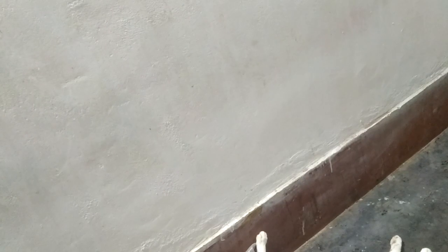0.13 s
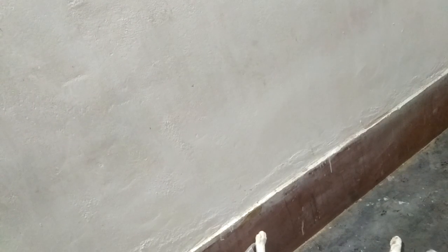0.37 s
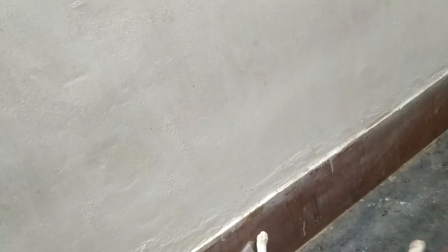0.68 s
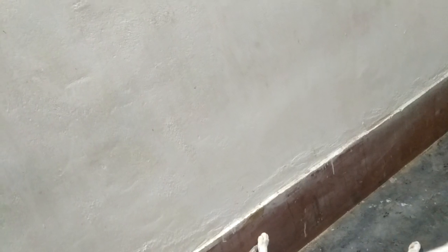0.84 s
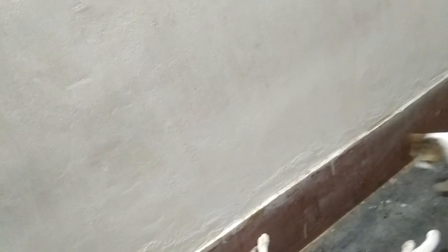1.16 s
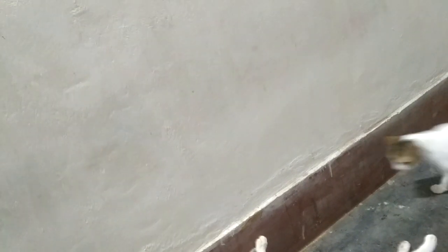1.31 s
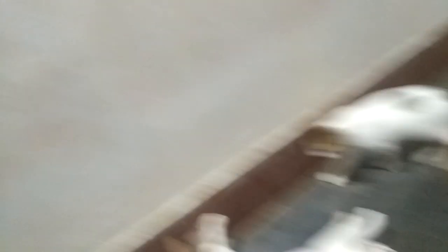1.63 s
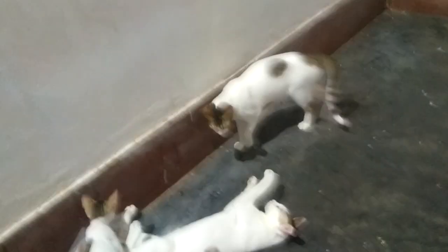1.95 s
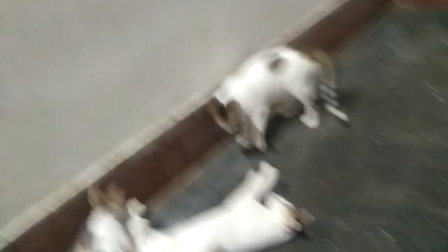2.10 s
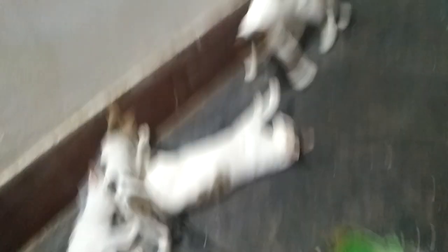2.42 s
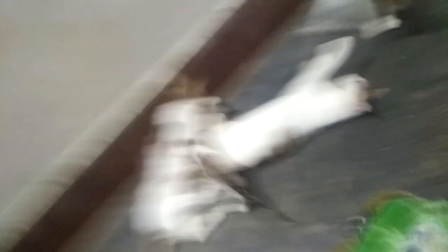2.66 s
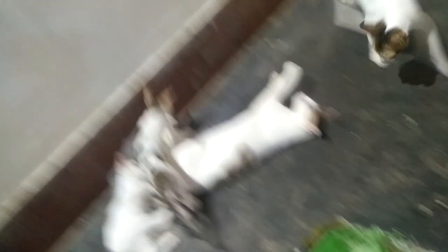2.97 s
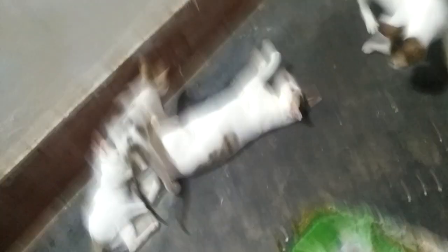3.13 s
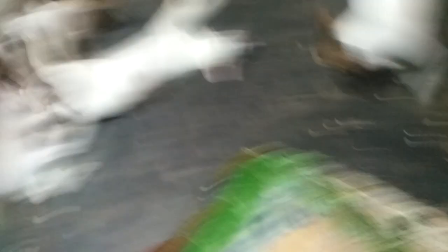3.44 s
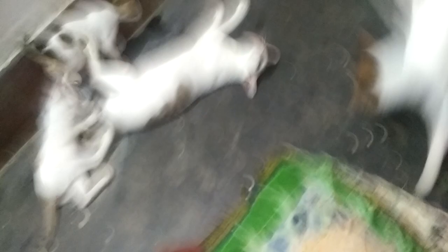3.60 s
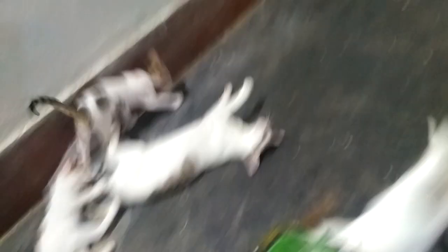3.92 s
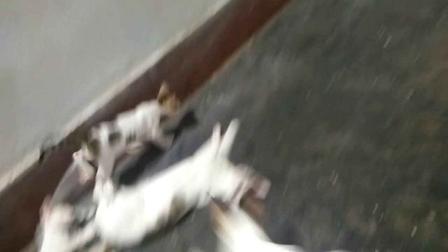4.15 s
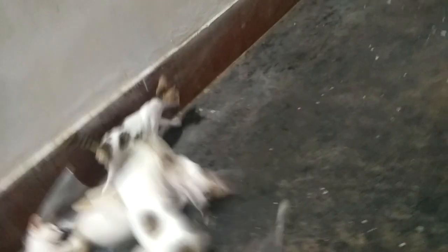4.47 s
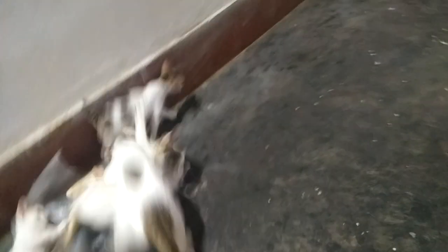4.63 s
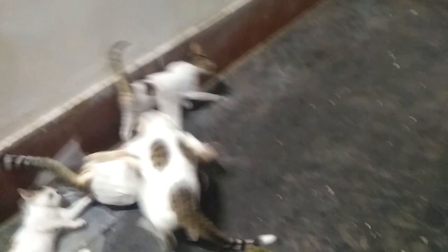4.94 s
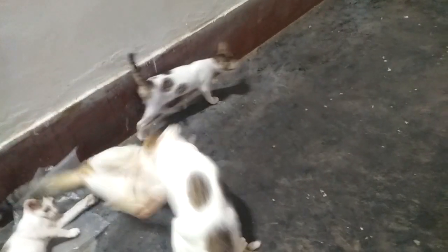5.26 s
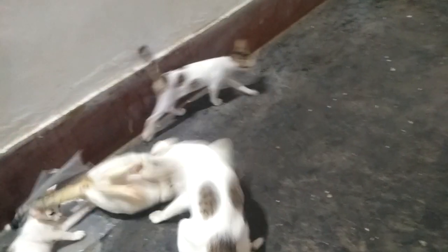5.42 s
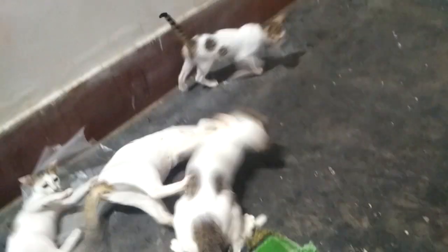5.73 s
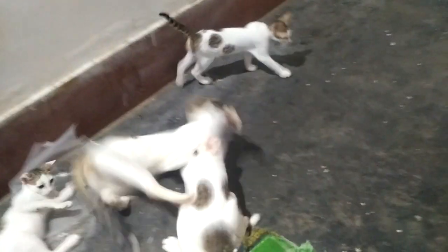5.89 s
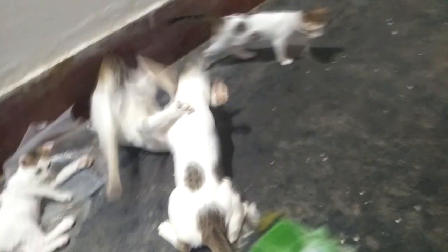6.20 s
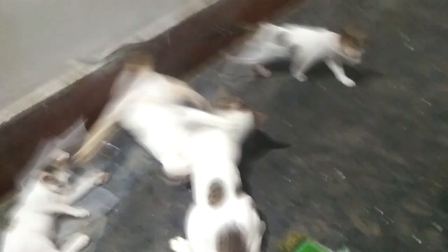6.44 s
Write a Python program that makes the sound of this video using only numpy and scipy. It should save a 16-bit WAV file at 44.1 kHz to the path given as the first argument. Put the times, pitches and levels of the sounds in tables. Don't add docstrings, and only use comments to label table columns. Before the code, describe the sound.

A single handheld phone microphone, bright on top, picks up quiet room tone and low handling thumps. Two kittens give short nasal meows across a bare-walled room. Close by, crisp plastic crackles in bursts, ending in a sharp rapid zip of clicks. A soft closed-mouth growl hums, a longer meow fades into a hoarse rising and falling yowl with kicking rustles, then a short growl and a last sharp scramble on the plastic.

```python
import sys
import numpy as np
from scipy import signal
from scipy.fft import rfft, irfft, next_fast_len
from scipy.io import wavfile
from scipy.ndimage import uniform_filter1d

SR = 44100
rng = np.random.default_rng(int(sys.argv[2]) if len(sys.argv) > 2 else 0)


def inscribe(sig):
    pcm = np.round(np.clip(np.atleast_2d(sig).T, -1, 1) * 32767)
    wavfile.write(sys.argv[1], SR, pcm.astype(np.int16))


def magnitude_from_level(level_db):
    exponent = np.asarray(level_db, float) / 20
    return 10 ** exponent


N = 289737

TAP_STARTS = [.4037, .4605, .5715, .5816, 1.1983, 1.6733, 2.9538, 3.3844, 3.458, 4.2333, 5.5139]
# pressure_drop_db, ring_hz, ring_over_drop_db, ring_t60_s
TAP_KNOCKS = [(-27.5, 75, -9, 0.072), (-28.5, 28, 1, 0.092), (-29, 65.8, 2.5, 0.075), (-24, 62, -3, 0.083),
              (-28.5, 68, -2.5, 0.14), (-28, 67, -7.5, 0.17), (-28, 61, -8, 0.134), (-24, 61, -5, 0.071),
              (-40.5, 86, -2, 0.092), (-27.5, 65, -7.5, 0.14), (-27, 76, 1, 0.065)]
# frequency_hz, level_db
SHEET_SPECTRUM = [(2350, -87), (3300, -40), (4000, -23), (4410, -19), (4840, -14), (5350, -11),
                  (6740, -2.5), (7880, 1.5), (10000, 6), (15200, -9.5), (16000, -20.5)]
# frequency_hz, level_db
DULL_SPECTRUM = [(500, 1), (1000, -8.5), (2000, 6.5), (3500, 8.5), (5500, 6), (7000, -2.5)]


def unit(x):
    return x / np.sqrt(np.mean(x ** 2))


def shape(hz, points):
    f, db = np.transpose(points)
    return magnitude_from_level(np.interp(np.log(np.maximum(hz, 1)), np.log(f), db, left=-90, right=-90))


def colour(x, points):
    size = next_fast_len(len(x))
    hz = np.arange(size // 2 + 1) * SR / size
    return irfft(rfft(x, size) * shape(hz, points), size)[:len(x)]


def walk(count, rate):
    hold = max(int(SR / rate), 1)
    steps = np.repeat(rng.standard_normal(count // hold + 1), hold)
    return 1.252 * uniform_filter1d(uniform_filter1d(steps, hold), hold)[:count]


def decay(t, t60_s):
    return np.exp(-np.log(1000) * t / t60_s)


def span(table, fade_s):
    s, *columns = np.transpose(table)
    first, last = s[0], s[-1]
    t = np.arange(int(first * SR), min(int(last * SR), N)) / SR
    gate = np.clip(np.minimum(t - first, last - t) / fade_s, 0, 1)
    return int(first * SR), gate, [np.interp(t, s, c) for c in columns]


def stroke(s, rise_s, hold_s, fall_s, db):
    end = s + hold_s
    return [(s - 2 * rise_s, db - 40), (s, db), (end, db), (end + 2 * fall_s, db - 40)]


def add(out, start, x):
    start = max(start, 0)
    out[start:start + len(x)] += x[:N - start]


def room(x, direct):
    t = np.arange(SR // 2) / SR
    tail = rng.standard_normal(len(t)) * decay(t, 0.31) * (t > .004)
    diffuse = signal.fftconvolve(x, tail / np.linalg.norm(tail))[:N]
    return np.sqrt(direct) * x + np.sqrt(1 - direct) * diffuse


def air():
    # frequency_hz, level_db
    tone_spectrum = [(20, -45.5), (35, -15), (60, -10), (95, -2.5), (160, -10.5), (270, -7), (560, -17),
                     (950, -16.5), (1500, -22.5), (2600, -26.5), (5500, -38), (8000, -40), (10500, -30),
                     (12500, -45), (13500, -64)]
    bed = colour(rng.standard_normal(N), tone_spectrum)
    out = np.zeros(N)
    for hz in 35 * 2. ** np.arange(9):
        octave = [(hz / 2, -60), (hz / 1.5, -6), (hz / 1.33, 0), (hz * 1.33, 0), (hz * 1.5, -6), (hz * 2, -60)]
        unrest = min(1, (500 / hz) ** .4)
        swell_db = .8 * walk(N, 3) + 2.2 * walk(N, 16)
        out += colour(bed, octave) * magnitude_from_level(unrest * swell_db)
    return unit(out) * magnitude_from_level(-64.5)


def thuds():
    # start_s, peak_db, pitch_hz, t60_s
    landings = [(0.509, -38, 73.4, 0.09), (1.249, -44, 480, 0.058), (1.453, -48, 150, 0.06),
                (1.77, -54.5, 295, 0.13), (1.86, -54.5, 295, 0.09), (1.967, -52.5, 261, 0.095),
                (2.116, -43.5, 283, 0.051), (2.387, -53, 315, 0.084), (2.55, -51, 296, 0.06),
                (2.813, -54, 96, 0.14), (3.475, -48, 110, 0.055), (5.342, -39.5, 1690, 0.028),
                (5.66, -49, 95, 0.12), (5.877, -52, 99.3, 0.28), (6.109, -43.5, 486, 0.034),
                (6.301, -54, 105, 0.11), (6.398, -50.5, 76, 0.077), (6.454, -47.5, 450, 0.079)]
    out, t = np.zeros(N), np.arange(SR // 4) / SR
    for s, db, hz, t60_s in landings:
        push = 1 - np.exp(-t / 0.0023)
        add(out, int(s * SR), magnitude_from_level(db) * np.sin(2 * np.pi * hz * t) * push * decay(t, t60_s))
    return out


def taps():
    # frequency_hz, level_db
    port_spectrum = [(18, -31.5), (35, -2.5), (50, 1.5), (9000, 0), (12000, -7), (14000, -26.5),
                     (16500, -42.5)]
    rattle_spectrum = [(40, -16), (100, 9.5), (400, -14.0), (1500, -22), (3000, -31.0)]
    out, t = np.zeros(N), np.arange(SR // 4) / SR
    for s, (db, ring_hz, ring_db, t60_s) in zip(TAP_STARTS, TAP_KNOCKS):
        turns = ring_hz * (t + 0.0012 * (1 - np.exp(-t / 0.0025)))
        ring = np.sin(2 * np.pi * (turns - .05)) * decay(t, t60_s) * (1 - np.exp(-t / 0.00028))
        sway = 0.23 * np.sin(2 * np.pi * 50 * t) * np.exp(-t / 0.039)
        rattle = unit(colour(rng.standard_normal(len(t)), rattle_spectrum)) * 0.19 * np.exp(-t / 0.023)
        drop = np.exp(-t / 0.00079)
        add(out, int(s * SR), magnitude_from_level(db) * (magnitude_from_level(ring_db) * (ring + sway) + rattle - drop))
    return colour(out, port_spectrum)


def scuffs():
    # start_s (of full strength), rise_s (per 20 dB), hold_s, fall_s (per 20 dB), level_db
    drags = [(1.825, .004, .03, .1, -60), (1.865, .04, .01, .2, -56), (1.948, .003, .012, .1, -34),
             (1.975, .02, .025, .18, -36), (2.08, .1, .04, .1, -44), (2.18, .1, .04, .15, -40.5),
             (2.28, .1, .035, .07, -46.5), (2.36, .05, .003, .12, -56), (2.455, .02, .01, .07, -59),
             (2.505, .015, .003, .08, -48), (2.55, .03, .015, .04, -57), (2.6, .02, .03, .05, -64),
             (2.93, .002, .003, .01, -61), (3.145, .01, .03, .04, -54), (3.52, .05, .012, .02, -49),
             (3.555, .01, .05, .085, -54.5), (6.388, .005, .006, .07, -36.5)]
    pounces = [(3.062, .008, .07, .03, -60), (3.252, .03, .01, .1, -45), (3.275, .03, .07, .01, -42.5),
               (3.392, .01, .04, .03, -30), (3.44, .02, .018, .008, -36.5), (6.162, .025, .02, .08, -42),
               (6.195, .05, .03, .12, -40), (6.26, .06, .04, .07, -46.5), (6.427, .003, .003, .05, -31),
               (6.45, .02, .05, .05, -36), (6.525, .1, .05, .1, -32.5)]
    shuffles = [(.788, 0.051, .003, 0.15, -67.5), (3.899, 0.097, 0.13, .05, -74),
                (4.348, 0.12, .003, 0.28, -74), (4.5, 0.37, 0.0028, 0.024, -72.5),
                (5.08, 0.19, 0.014, 0.29, -71.5), (5.3, 0.13, 0.017, 0.21, -71.5),
                (5.662, 0.078, 0.0029, 0.24, -69), (5.985, 0.03, 0.037, 0.15, -60)]
    kicks = [(4.549, .015, .01, .1, -55.5), (4.6, 0.058, 0.056, 0.088, -43.5),
             (4.659, 0.04, 0.0083, 0.21, -39.5), (4.787, 0.13, 0.031, 0.22, -41),
             (4.889, 0.12, 0.022, 0.11, -47.5), (4.96, 0.16, 0.026, 0.11, -57.5),
             (5.07, .1, 0.019, .07, -65)]
    rubs = [(0.924, 0.035, 0.073, 0.12, -62.5), (3.362, 0.027, 0.028, .008, -48.5),
            (6.463, 0.044, 0.029, .1, -48)]
    slides = [(4.04, 0.0092, 0.13, 0.048, -56)]
    # dull_over_bright_db, tautness_scale (of the spectrum), above_13_khz_db
    grips = [
        (-27, 1.05, -5),
        (-21, 0.97, -3.5),
        (-11, 0.94, -0.5),
        (-10, 0.95, -7.5),
        (1, 0.75, -3),
        (-31, 1.47, -34),
        (-4.5, 0.82, -12),
    ]
    rustles = [(s, .001, .001, 0.11, knock[0] - 37.5) for s, knock in zip(TAP_STARTS, TAP_KNOCKS)]

    size_db = np.minimum(4.5 * rng.exponential(1, N), 8) + 0.72 * walk(N, 60)
    slips = rng.standard_normal((2, N)) * magnitude_from_level(size_db)
    edges = (1, 6500, 9000, 12000, SR / 2)
    patchy = np.zeros(N)
    for lo, hi in zip(edges, edges[1:]):
        patchy += colour(slips[0], [(lo, 0), (hi, 0)]) * magnitude_from_level(1.4 * walk(N, 45))
    dull = unit(colour(slips[1], DULL_SPECTRUM))

    out = np.zeros(N)
    kinds = (drags, pounces, shuffles, kicks, rubs, slides, rustles)
    for strokes, (dull_db, taut, top_db) in zip(kinds, grips):
        bright = unit(colour(patchy, [(hz * taut, db) for hz, db in SHEET_SPECTRUM]))
        bright = colour(bright, [(1, 0), (12000, 0), (13000, top_db), (SR / 2, top_db)])
        low = colour(bright, [(1, 0), (5000 * .85, 0), (5000 * 1.15, -30)])
        pressure = np.zeros(N)
        for row in strokes:
            start, gate, (db,) = span(stroke(*row), fade_s=.001)
            cut = slice(start, start + len(gate))
            pressure[cut] = np.maximum(pressure[cut], gate * magnitude_from_level(db))
        firm = np.minimum(pressure / magnitude_from_level(-44.5), 1.5) ** .6
        out += pressure * (bright + (firm - 1) * low + magnitude_from_level(dull_db) * dull)
    return out


def snaps():
    # start_s, peak_db, centre_hz, dull_over_peak_db
    creases = [(1.014, -41.7, 6200, -16), (1.8299, -21.2, 9900, -48), (1.858, -39.7, 9700, -23),
               (1.9505, -23.5, 10000, -41), (1.9817, -22.4, 10100, -40), (2.3868, -38.8, 9700, -28),
               (2.439, -30.8, 10900, -33), (2.5041, -23.2, 10100, -25), (2.5085, -28.2, 10200, -33),
               (2.5286, -38.3, 9900, -27), (2.5729, -50.1, 9500, -16), (2.6165, -28.2, 9500, -35),
               (2.9303, -46.4, 9900, -25), (3.111, -43, 10500, -28), (3.1375, -33.5, 9800, -28),
               (3.2276, -44.8, 10400, -19), (3.3397, -24.3, 10100, -27), (3.3461, -21.5, 8600, -29),
               (3.5095, -35.7, 7900, -21), (3.5505, -33.0, 9100, -33), (4.1053, -39.2, 11100, -16),
               (4.592, -36, 9500, -30), (4.777, -30, 7000, -20), (4.912, -31, 8000, -18),
               (5.9797, -50.0, 9400, -16), (6.3908, -22.1, 10500, -40), (6.4278, -17.9, 7900, -26),
               (6.4661, -25.0, 9100, -16), (6.549, -18.0, 9600, -23)]
    # start_s, peak_db, centre_hz
    ribs = [(3.3521, -11.5, 9000), (3.3571, -9.5, 10300), (3.3623, -9.5, 8200), (3.3669, -9, 8600),
            (3.3716, -6.5, 8600), (3.3767, -10, 9000), (3.3821, -7.5, 9500), (3.3872, -6, 9400)]
    rows = [(*row, .0001) for row in creases] + [(*row, -20, .00005) for row in ribs]
    out, t = np.zeros(N), np.arange(SR // 50) / SR
    for s, db, hz, dull_db, click_s in rows:
        fuzz = rng.standard_normal((2, len(t)))
        burst = (t / click_s / 2) ** 2 * np.exp(2 - t / click_s)
        click = np.cos(2 * np.pi * hz * (t - 2 * click_s)) * burst
        tick = magnitude_from_level(dull_db) * 2.2 * np.sin(2 * np.pi * 2700 * t) * np.exp(-t / 0.0002)
        shiver = unit(colour(fuzz[0], SHEET_SPECTRUM)) + 1.6 * magnitude_from_level(dull_db) * unit(colour(fuzz[1], DULL_SPECTRUM))
        shiver *= .1 * np.exp(-t / .0007) + .025 * np.exp(-t / .006)
        add(out, int((s - 2 * click_s) * SR), magnitude_from_level(db) * (click + tick + shiver))
    return out


def growls():
    # time_s, pitch_hz, level_db
    hums = [
        [(3.46, 153, -58), (3.48, 165.7, -63), (3.668, 163.8, -58), (3.752, 174.5, -64.5), (3.968, 178, -58.5),
         (4.002, 167, -71), (4.05, 160, -67)],
        [(5.86, 162, -62), (5.874, 169, -81.5), (5.896, 179, -73), (6.0, 192.7, -54.5), (6.042, 203, -45),
         (6.075, 199, -58), (6.2, 205, -76.5)],
    ]
    out = np.zeros(N)
    for table in hums:
        start, gate, (hz, db) = span(table, fade_s=.02)
        n = len(gate)
        phase = 2 * np.pi * np.cumsum(hz * (1 + 0.05 * walk(n, 55.2))) / SR
        hum = 0.92 * np.sin(phase) + 0.047 * np.sin(2 * phase)
        add(out, start, gate * magnitude_from_level(db + 2.5 * walk(n, 41.5)) * hum)
    return out


def meows():
    # time_s, second_partial_db, third_over_second_db
    calls = [
        [(0.0, -59.5, -2.5), (0.14, -55.5, -30), (0.17, -62, -18), (0.27, -100, -13)],
        [(0.61, -71, -13), (0.758, -41.5, 2), (0.844, -47.5, -2.5), (0.88, -53, 9), (0.932, -44.5, -3.5),
         (1.02, -49.5, -4.5), (1.09, -57, -0.5), (1.19, -51, -6.5), (1.4, -87, 13.5)],
        [(3.82, -72, -8), (3.906, -50.5, -1), (3.926, -41, -5), (3.972, -35.5, -10), (4.118, -43, -12),
         (4.27, -51, -2.5), (4.38, -49, -32.5), (4.512, -62.5, -12), (4.58, -79.5, -7)],
        [(0.69, -68.5, 20), (0.784, -30.5, -12.5), (1.02, -63.5, -10), (1.06, -74, 4)],
        [(1.235, -70, -11), (1.259, -40.5, -11), (1.29, -74, -14)],
    ]
    # first_over_second_db (at middling effort), fourth_over_third_db, rasp (0-1)
    voices = [(-5, -28, 0.5), (-14, -30.5, 0.6), (-18.5, -17, 0.49), (-24.5, -49, 0.31), (-9.5, -29, 0.7)]
    # time_s, pitch_hz
    high_pitch = [(0, 540), (.25, 518), (.63, 555), (.72, 532), (.9, 530), (1.1, 552), (1.4, 538),
                  (3.82, 575), (4, 562), (4.15, 575), (4.3, 588), (4.6, 590)]
    # time_s, pitch_hz
    low_pitch = [(.69, 495), (.8, 484), (1.06, 488), (1.29, 470)]
    # frequency_hz, level_db
    rasp_spectrum = [(350, -39.5), (600, -33.5), (900, 2), (1200, 8), (1700, 5), (2000, 2), (2400, -24.5),
                     (3600, -31), (4200, -43.5)]
    out = np.zeros(N)
    pitches = (high_pitch, high_pitch, high_pitch, low_pitch, low_pitch)
    for table, pitch, (first_db, fourth_db, rasp) in zip(calls, pitches, voices):
        start, gate, (db, high_db) = span(table, fade_s=0.0023)
        n, rasp = len(gate), np.clip(rasp, .2, .5)
        t = np.arange(n) / SR
        low_db = np.minimum(first_db - .94 * (db + 49.5) + 11 * (t - .3), 10)
        hz = np.interp((start + np.arange(n)) / SR, *np.transpose(pitch))
        jitter = walk(n, 300)
        jitter = jitter - uniform_filter1d(jitter, SR // 25)
        phase = 2 * np.pi * np.cumsum(hz * (1 + .006 * walk(n, 40) + .065 * rasp * jitter)) / SR
        levels_db = (low_db, 0, high_db, *(high_db + fourth_db - 7.0 * k for k in range(3)))
        smears = (1.2, 0, .3, 2.5, 4, 5)
        tone = np.zeros(n)
        for k, (level_db, smear) in enumerate(zip(levels_db, smears), 1):
            tone += magnitude_from_level(level_db + 7 * rasp * walk(n, 90)) * np.sin(k * phase + smear * walk(n, 110))
        breath = unit(colour(rng.standard_normal(n), rasp_spectrum)) * rasp * magnitude_from_level(-2.5)
        flutter = 1 + .38 * np.cos(2 * np.pi * np.cumsum(62 * (1 + .25 * walk(n, 40))) / SR)
        add(out, start, gate * magnitude_from_level(db) * flutter * (1.596 * tone + breath))
    return room(out, direct=0.86)


def yowl():
    # time_s, pitch_hz, level_db, chest_over_level_db, mouth_opening_scale
    contour = [(4.45, 180.8, -55.5, 3, 0.94), (4.53, 177.9, -54.5, -10, 0.88), (4.548, 192, -38, -9, 1.06),
               (4.6, 265, -33, -16.5, 1.08), (4.645, 345.2, -26, -22.5, 0.94), (4.69, 352.7, -26.5, -26, 1.07),
               (4.77, 368.4, -32, -25.5, 1.16), (4.85, 378.2, -27.5, -32.5, 1.02),
               (4.895, 380.8, -33, -38, 1.14),
               (4.925, 375, -36.5, -15.5, 0.93), (4.99, 361.3, -35.5, -20, 1.07),
            (5.02, 362.2, -37.5, -35, 0.99), (5.08, 345, -38.5, -36, 1.08), (5.11, 328.5, -38, -18, 1.09),
            (5.2, 302.6, -38, -10, 0.8), (5.245, 288.9, -46, -15, 0.82), (5.345, 264.2, -62, -10, 0.93),
            (5.38, 263.4, -64, -3, 1.3)]
    # frequency_hz, level_db
    throat_spectrum = [(250, -48.5), (470, -38), (800, -10.5), (1030, -3.5), (1490, 7), (1790, 7),
                       (2120, 1), (2550, -11), (3200, -20), (3940, -35.5), (5000, -52), (6500, -57.5),
                       (11000, -120)]
    out = np.zeros(N)
    start, gate, (hz, db, chest_db, mouth) = span(contour, fade_s=0.063)
    n = len(gate)
    slide = uniform_filter1d(np.abs(np.gradient(np.log(hz))) * SR, SR // 30)
    rough = np.clip(.259 + .12 * slide, .26, .8)
    hz = hz * (1 + .011 * walk(n, 40) + .05 * rough * walk(n, 200))
    phase = 2 * np.pi * np.cumsum(hz) / SR
    partials = np.array([shape(k * hz / mouth, throat_spectrum) for k in range(3, 22)])
    partials /= np.sqrt(np.sum(partials ** 2, axis=0) / 2) + 1e-9
    voiced = np.zeros(n)
    for k, gain in enumerate(partials):
        wander = 1.1 * k + (.6 + .08 * k) * walk(n, 70)
        voiced += gain * magnitude_from_level(3.0 * walk(n, 50)) * np.cos((k + 3) * phase + wander)
    breath = unit(colour(rng.standard_normal(n) * (1 + np.cos(phase)), throat_spectrum))
    grate = 1 + np.clip(.45 + .3 * walk(n, 15), 0, 1) * np.cos(phase / 3)
    throat = grate * magnitude_from_level(1.02 * walk(n, 69.7)) * (np.sqrt(1 - rough) * voiced + np.sqrt(rough) * breath)
    chest = magnitude_from_level(chest_db + 3.5 * walk(n, 70)) * np.sin(phase + .9 * walk(n, 120))
    octave_db = -24.5 + 55 * (1 - mouth) + 5 * walk(n, 90)
    octave = magnitude_from_level(octave_db) * np.sin(2 * phase + 1.7 * walk(n, 150))
    half_db = -14 + .6 * chest_db + 5 * walk(n, 30)
    half = magnitude_from_level(half_db) * np.sin(1.5 * phase + 2.5 * walk(n, 150))
    add(out, start, gate * magnitude_from_level(db) * (throat + 1.61 * chest + 1.7 * octave + half))
    return room(out, direct=0.58)


def scene():
    mono = air() + thuds() + taps() + scuffs() + snaps() + growls() + meows() + yowl()
    return np.array([mono, mono])


def roll_off(x):
    return signal.sosfilt(signal.butter(12, 16470, fs=SR, output="sos"), x)


def record(dry):
    microphone = colour(dry[0], [(1, 0), (15800, 0), (16000, -70)])
    return roll_off(np.array([microphone, microphone]))


dry = scene()
out = record(dry)
inscribe(out)
```